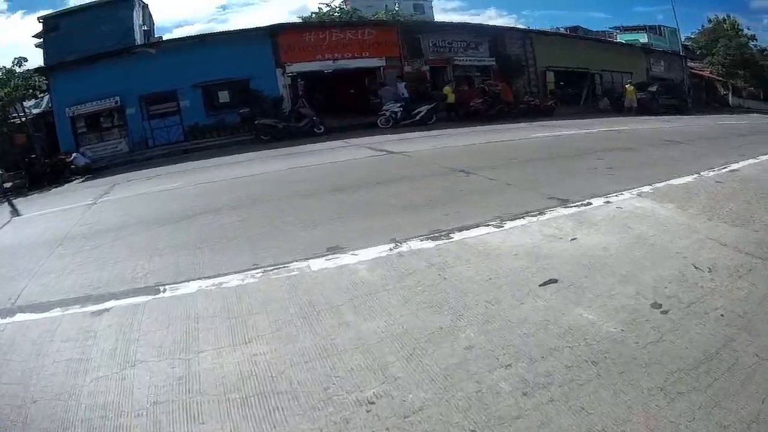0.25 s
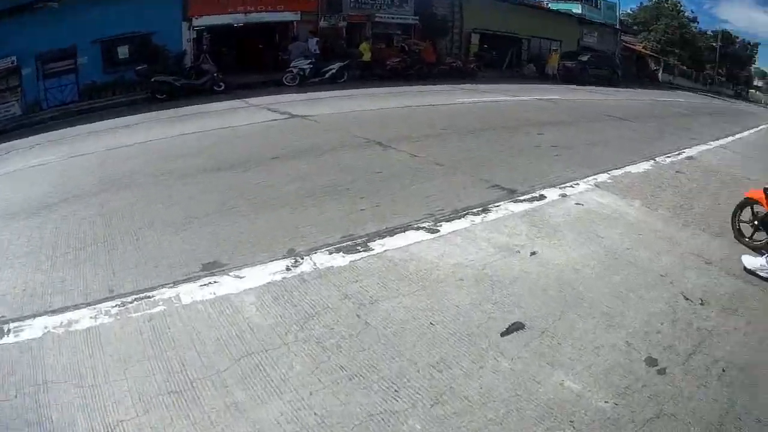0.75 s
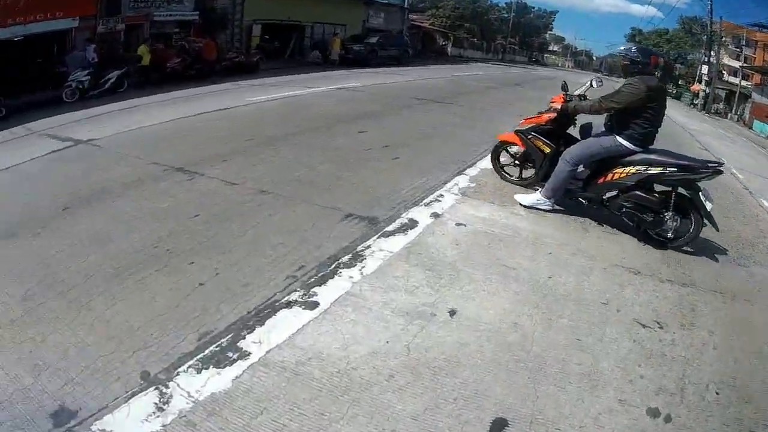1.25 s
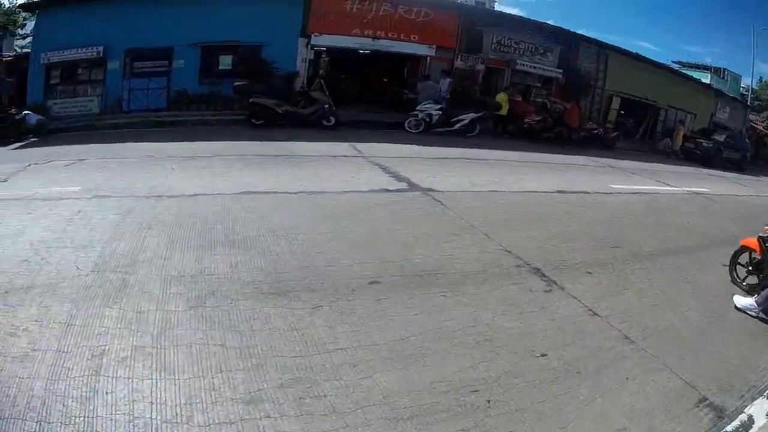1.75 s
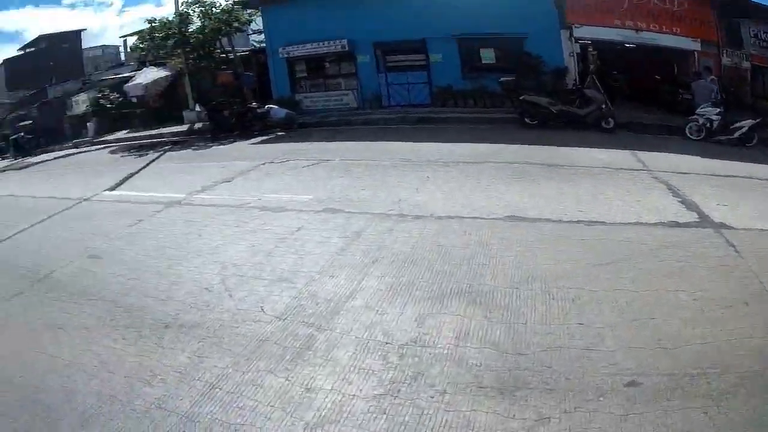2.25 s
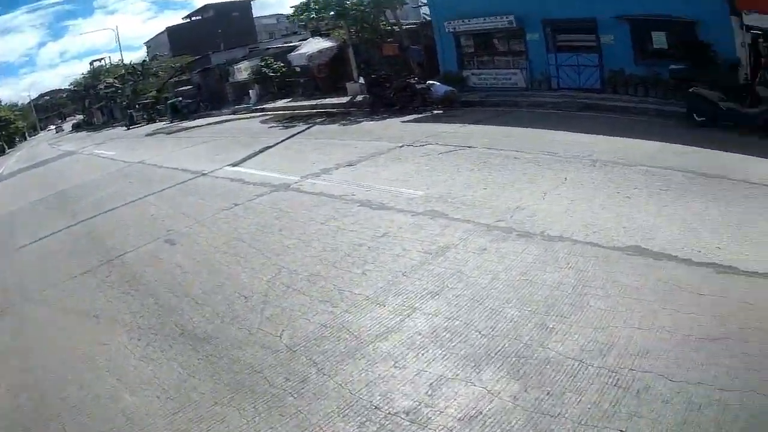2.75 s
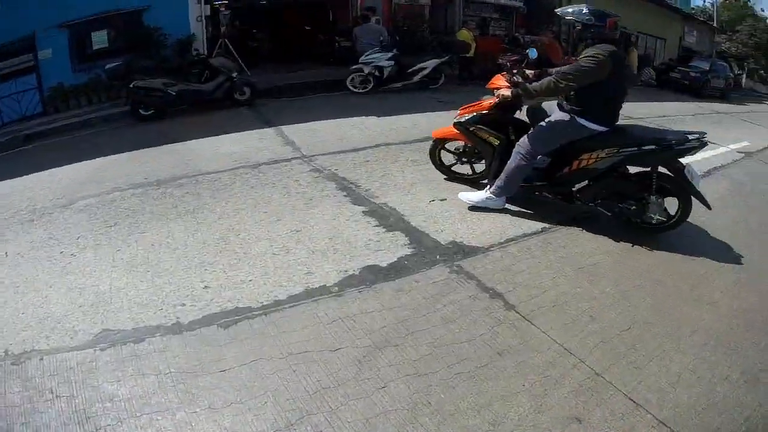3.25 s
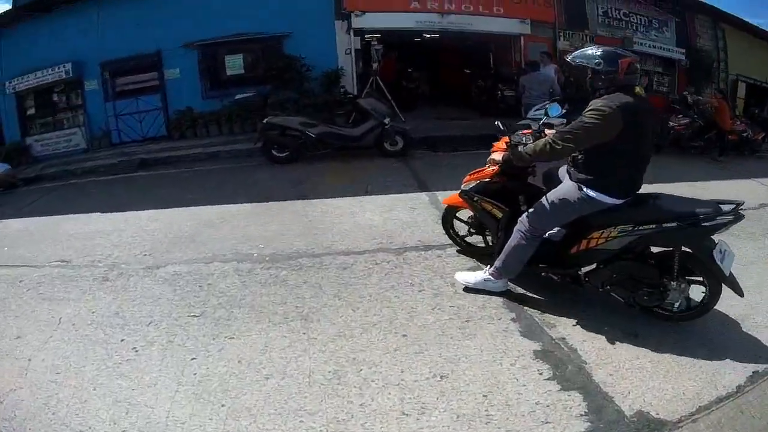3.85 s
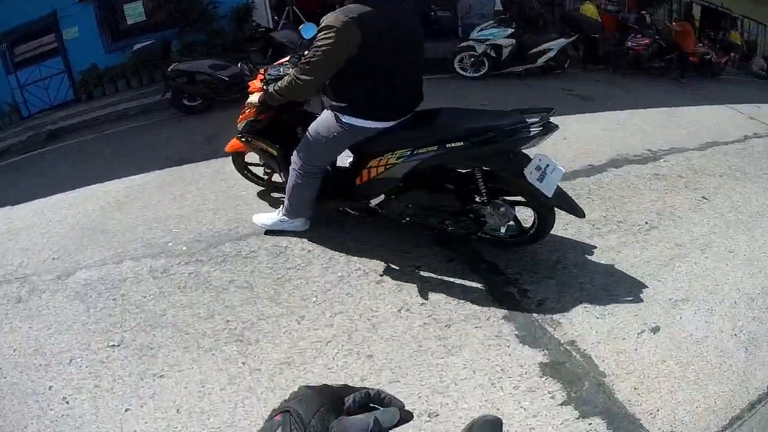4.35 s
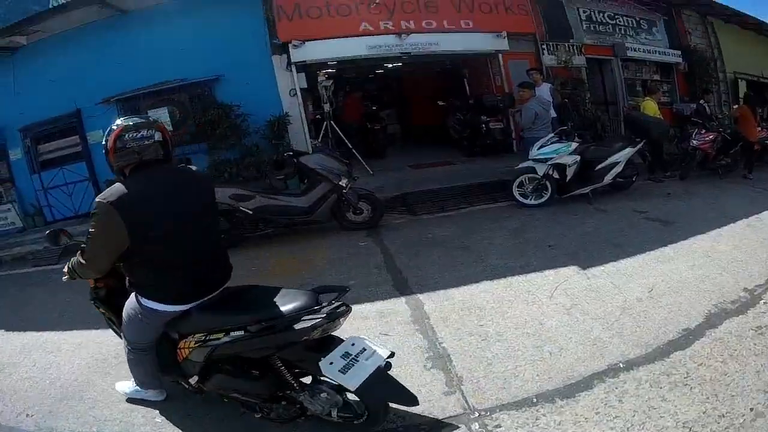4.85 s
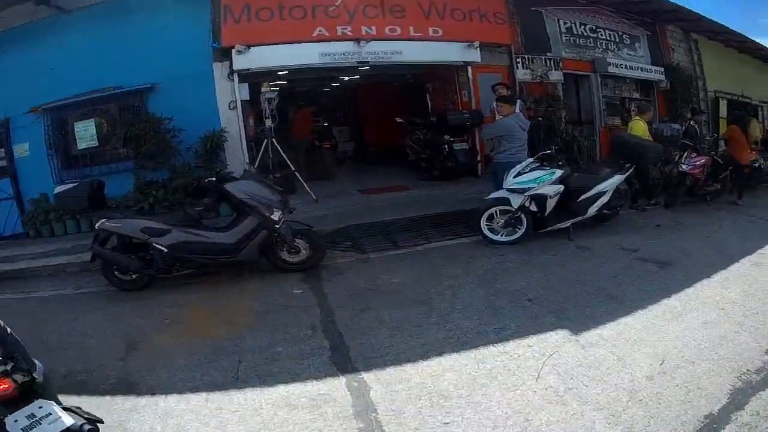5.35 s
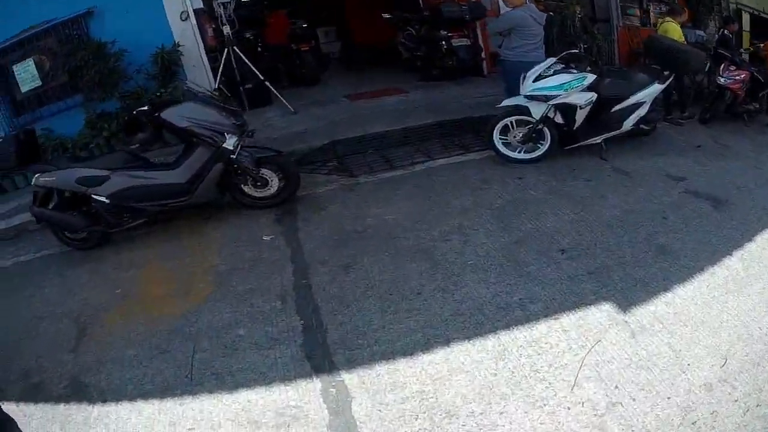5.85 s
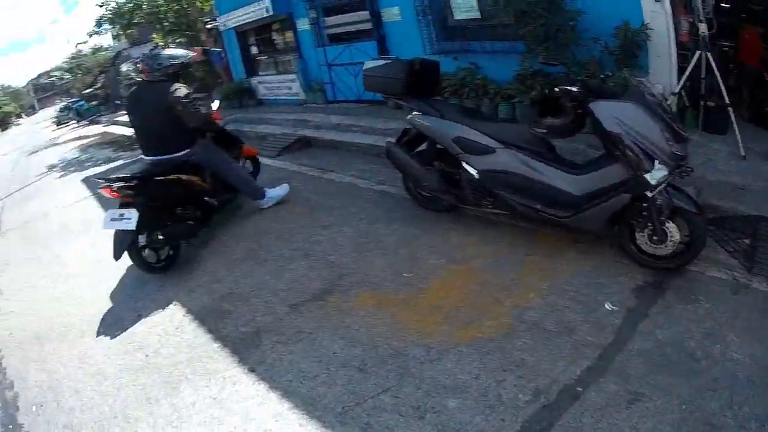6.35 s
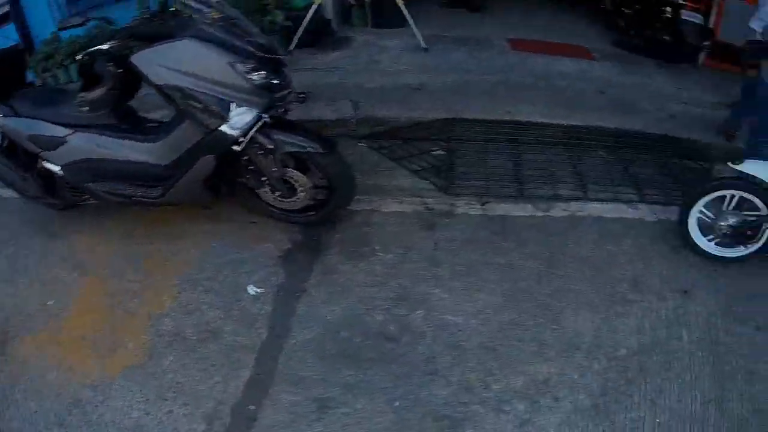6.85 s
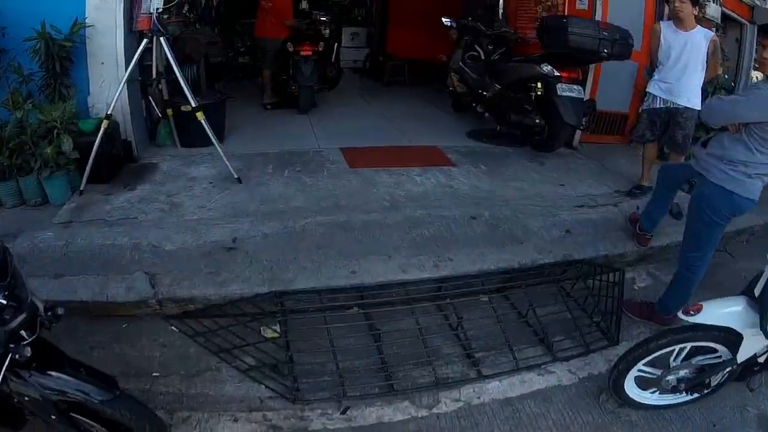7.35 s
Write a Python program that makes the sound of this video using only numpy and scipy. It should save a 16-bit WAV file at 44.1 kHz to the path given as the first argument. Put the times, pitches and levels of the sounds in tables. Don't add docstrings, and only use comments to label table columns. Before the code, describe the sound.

A small scooter putters down to a slow idle beside a road, with heavy low thumps on the microphone, rumbling wind and thin belt whine.

```python
import sys
import numpy as np
from scipy import signal
from scipy.fft import rfft, irfft
from scipy.io import wavfile
from scipy.ndimage import uniform_filter1d, minimum_filter1d

SR = 44100
rng = np.random.default_rng(int(sys.argv[2]) if len(sys.argv) > 2 else 0)


def to_linear_factor(level_db):
    exponent = np.asarray(level_db, float) / 20
    return 10 ** exponent


def master_out(mix):
    frames = np.transpose(np.atleast_2d(mix))
    ceiling = np.clip(frames, -1, 1)
    pcm = np.round(ceiling * 32767).astype(np.int16)
    wavfile.write(sys.argv[1], SR, pcm)


N = 335160


def rms_one(x):
    return x / np.sqrt(np.mean(x ** 2) + 1e-20)


def in_time(rows):
    s, *columns = np.transpose(rows)
    ends_early = s[-1] < N / SR - .1
    t = np.arange(N) / SR
    return [np.interp(t, s, c, left=-120, right=-120 if ends_early else c[-1]) for c in columns]


def swells(rows, rest_db):
    t, power = np.arange(0, N, 32) / SR, 0
    for s, db, length in rows:
        power = power + to_linear_factor(2 * db) * np.exp(-2 * ((t - s) / length) ** 2)
    return np.sqrt(np.interp(np.arange(N) / SR, t, power) + to_linear_factor(2 * rest_db))


def drift(rate):
    r = np.exp(-80 * np.pi * rate / SR)
    slow = signal.lfilter([1], [1, -2 * r, r * r], rng.standard_normal(N // 40 + 2002))[2000:]
    return np.interp(np.arange(N) / 40, np.arange(len(slow)), rms_one(slow))


def steadied(x, size):
    steady_share = .55
    power = uniform_filter1d(uniform_filter1d(x ** 2, size=size), size=size)
    return rms_one(x / (power + 1e-12) ** (steady_share / 2))


def ring(clicks, hz, t60):
    r, w = to_linear_factor(-60 / (t60 * SR)), 2 * np.pi * hz / SR
    return signal.lfilter([0, np.sin(w)], [1, -2 * r * np.cos(w), r * r], clicks + 1e-18)


def resonant(x, peaks, flicker_db):
    out = 0
    for k, (hz, width, db) in enumerate(peaks):
        r = np.exp(-np.pi * width / SR)
        poles = [1, -2 * r * np.cos(2 * np.pi * hz / SR), r * r]
        section = [(1 - r * r) / 2, 0, (r * r - 1) / 2] + poles
        gain = to_linear_factor(db + flicker_db * drift(25))
        out = out + (-1) ** k * gain * signal.sosfilt([section, section], x)
    return rms_one(out)


def coloured(spectrum):
    hz, db = np.transpose(spectrum)
    grid = np.log(np.arange(1, N // 2 + 2) * SR / N)
    gain = to_linear_factor(np.interp(grid, np.log(hz), db, left=-90, right=-90))
    return rms_one(irfft(rfft(rng.standard_normal(N)) * gain, N))


def add(out, s, piece):
    at = round(s * SR)
    out[at:at + len(piece)] += piece[:N - at]


# start_s, firing_rate_hz
FIRING = [(0.0, 27.56), (0.22, 27.25), (0.43, 21.97), (0.9, 19.66), (1.16, 25.99), (1.33, 26.75),
          (1.41, 33.43), (1.74, 22.47), (2.06, 20.76), (3.02, 16.36), (3.29, 16.53), (3.72, 14.65),
          (4.44, 14.37), (4.7, 17.81), (4.86, 19.86), (5.51, 14.72), (6.57, 14.47), (7.6, 15.23)]


def cycle():
    first_turn = .72
    return first_turn + np.cumsum(in_time(FIRING)[0]) / SR


# start_s, level_db
CLATTER = [(0.0, -32.5), (0.27, -35.5), (0.93, -38.5), (1.08, -35), (1.35, -30), (1.6, -33), (1.95, -38),
           (2.2, -39.5), (2.45, -36), (2.8, -42), (3.35, -39), (4.2, -38), (4.9, -37.5), (5.3, -40.5),
           (5.6, -39.5), (6.55, -38.5), (7.35, -39), (7.6, -36)]


def effort():
    level_db, = in_time(CLATTER)
    return level_db - level_db.mean()


def throb(turns):
    angle = 2 * np.pi * (turns - .1)
    return to_linear_factor(1.3 * np.cos(2 * angle) + .8 * np.cos(angle))


def grains():
    jumps = to_linear_factor(.7 * rng.exponential(1, N // 64 + 1))
    return rng.standard_normal(N) * jumps.repeat(64)[:N]


# pitch_hz, level_db
HISS = [(530, -7), (900, 1), (1450, -12), (2000, -1.5), (3070, -13), (9510, -17.5), (14400, -20),
        (15500, -6)]


def hiss():
    return to_linear_factor(-49) * coloured(HISS)


# start_s, level_db
WIND = [(0.0, -34.5), (0.8, -35.5), (1.44, -31), (1.75, -35.5), (2.24, -33.5), (2.45, -23.5), (2.63, -23),
        (2.69, -37), (2.83, -30), (3.2, -33), (3.36, -29), (3.6, -33), (3.78, -26), (4.02, -37),
        (4.7, -32.5), (5.52, -36.5), (6.4, -34), (7.6, -36.5)]
# peak_s, level_db, length_s, size_db (large buffet, small rumble)
EDDIES = [(.2, -33.5, 0.39, -9.5), (.63, -55, 0.13, -4), (1.12, -24.5, 0.069, -5.5), (1.5, -22.5, 0.17, 6),
          (1.9, -30.5, 0.064, -10), (2.05, -24.5, 0.036, -10.5), (2.52, -18.5, 0.11, -4),
          (2.34, -30, 0.042, 4), (1.7, -34.5, 0.076, -9), (4.17, -22, 0.032, -9), (5.06, -29, .06, -3),
          (4.29, -28, 0.027, -11.5), (4.95, -25.5, 0.07, -6), (5.22, -23, .08, -6.5),
          (.3, -30.5, 0.044, -11), (2.97, -23, 0.051, 0), (3.1, -27.5, 0.12, 2.5), (3.38, -22, 0.044, -4),
          (1.35, -23.5, .05, -7), (.78, -34, 0.072, -5), (3.68, -23, 0.065, -7), (3.82, -20.5, 0.24, -6.5),
          (4.23, -29, 0.17, 3), (4.44, -23, 0.19, 1), (4.76, -21, 0.11, -2), (4.95, -23.5, 0.096, 2.5),
          (5.42, -25.5, 0.2, -3), (5.84, -20.5, 0.097, -2.5), (6.18, -26, 0.16, -3.5),
          (6.33, -18.5, 0.13, 3.5), (6.54, -29.5, 0.12, -7.5), (6.72, -23, 0.1, 1.5),
          (6.94, -26, 0.07, -9.5), (7.25, -32, 0.39, -4.5), (7.47, -32, 0.084, 5)]
# pitch_hz, level_db_per_hz
BUFFET = [(5.9, -45), (10, -5), (43, -10), (70, -13), (91, -38), (150, -120)]
RUMBLE = [(35, -20), (48, -4), (64, 0), (80, -6), (100, -17), (150, -27)]
ROAR = [(110, 4.5), (160, -3), (230, -8), (350, -11), (600, -14), (800, -20.5), (1070, -27.5), (1400, -29)]


def wind():
    lumps, calm_db, roar_db = drift(12), -29, 0.5
    large = swells([(s, db + size, length) for s, db, length, size in EDDIES], calm_db)
    small = swells([(s, db - size, length) for s, db, length, size in EDDIES], calm_db)
    out = large * to_linear_factor(1.0 + 2.9 * lumps) * coloured(BUFFET)
    shed = steadied(coloured(RUMBLE), size=900)
    out += small * to_linear_factor(-.5 + 1.2 * lumps + .8 * drift(7)) * shed
    flow_db = in_time(WIND)[0] + roar_db + 0.087 * lumps + 1.63 * drift(35.0)
    return out + to_linear_factor(flow_db) * coloured(ROAR)


# peak_s, level_db, length_s
SEAMS = [
    (1.05, -45, 0.079),
    (1.37, -40, 0.2),
    (2.45, -43, 0.38),
    (3.43, -44, 0.22),
    (4.78, -44.5, 0.28),
    (6.31, -41, 0.035),
    (6.68, -40, 0.024),
    (2.5, -39.5, 0.086),
]
# pitch_hz, width_hz, level_db
TYRES = [(1487, 335, 9), (1180, 1080, -1.5)]


def tyres():
    mean_db, follows = -48, 0.91
    gain = swells(SEAMS, mean_db + follows * effort())
    return gain * resonant(grains(), TYRES, flicker_db=.9)


# peak_s, level_db, length_s
DRONE = [(0.7, -41.5, 0.47), (1.46, -40, 0.18), (1.88, -36, 0.37), (2.5, -39, 0.11), (3.05, -34.5, 0.2),
         (3.5, -27.5, 0.31), (3.9, -29, 0.45), (4.74, -31.5, 0.04), (5.1, -35.5, 0.56), (5.65, -47, 0.34),
         (6.45, -34, 0.44), (6.72, -35.5, 0.19)]
# pitch_hz, width_hz, level_db
PIPE = [(207.6, 18, 1.5), (253.8, 24.3, -2), (340, 56, -7.5), (586.5, 51, -17.5), (804, 18, -14.5)]


def drone():
    return swells(DRONE, -55) * to_linear_factor(-2.0) * resonant(rng.standard_normal(N), PIPE, flicker_db=2.5)


# peak_s, level_db, length_s
ALONGSIDE = [
    (2.42, -49, 0.24),
    (4.78, -39.5, 0.45),
    (5.15, -43, 0.24),
    (6.58, -44, 0.26),
    (7.2, -47, 0.12),
]
# pitch_hz, width_hz, level_db
FLANK = [(2732, 164, 3), (2474, 104, -4), (2225, 500, -7)]


def alongside(turns):
    mean_db, follows = -48, 1
    gain = swells(ALONGSIDE, mean_db + follows * effort())
    return gain * throb(turns) * resonant(grains(), FLANK, flicker_db=.9)


# peak_s, level_db, length_s
TURNS = [
    (0.0, -43, 0.11),
    (1.43, -41.5, 0.1),
    (2.64, -49, 0.15),
    (.15, -51, .1),
    (4.95, -55, 0.73),
    (5.97, -50, 0.61),
    (7.07, -45.5, 0.16),
]
# pitch_hz, width_hz, level_db
RUSTLE = [(4300, 1400, 7), (5700, 1630, 1), (6400, 1640, 1), (7950, 1270, 0)]


def rustle(turns):
    mean_db, follows = -50, 0.45
    gain = swells(TURNS, mean_db + follows * effort()) * to_linear_factor(-3.0)
    return gain * throb(turns) * resonant(grains(), RUSTLE, flicker_db=2.0)


# peak_s, level_db, length_s
SCUFF = [
    (6.665, -43.5, 0.028),
    (6.778, -41.5, 0.018),
    (7.455, -37, 0.04),
    (7.55, -37, 0.04),
    (7.578, -33.5, 0.019),
]
# pitch_hz, width_hz, level_db
CLOTH = [(3580, 530, 6.5), (4203, 590, 3.5), (5900, 1300, -6), (7570, 940, -5), (9900, 2600, -21)]


def scuff():
    slips = (rng.random(N) < 6000 / SR) * rng.standard_normal(N)
    slips = slips + 0.042 * rng.standard_normal(N)
    return swells(SCUFF, -120) * resonant(slips, CLOTH, flicker_db=1.5)


# start_s, peak_db, pitch_hz, t60_s, crack_db
TICKS = [(0.4, -14, 3350, 0.012, -9), (.409, -23.5, 3800, 0.047, -9), (0.454, -21, 3040, 0.016, -4),
         (1.2047, -41.5, 3040, 0.016, -9), (1.6701, -22, 2820, 0.012, -7), (3.4083, 2.5, 3540, 0.0078, -18),
         (3.914, -23, 2900, 0.02, -14), (4.573, -10, 2910, 0.014, -8), (4.629, -17, 2770, 0.016, -10),
         (4.9517, -16, 2900, 0.022, -23), (6.095, -21, 2750, 0.02, -9), (6.6506, -19, 2800, 0.012, -5),
         (6.77, -25, 4250, 0.015, 0), (6.99, -21, 3200, 0.029, -17), (7.373, -9, 3200, 0.011, -11),
         (7.427, -29, 3450, 0.013, -8), (7.447, -18, 3400, 0.011, -1), (7.545, -24, 3730, 0.047, -5),
         (7.582, -16, 3680, 0.015, -7)]
# start_s, peak_db, pitch_hz, t60_s
KNOCKS = [(.9065, -14, 520, .016), (.9065, -19, 700, .016), (.907, -16.5, 154, .036),
          (.9155, -18, 420, .02), (1.136, -6, 91, .06), (1.137, -7, 440, .021), (1.137, -17, 780, .018),
          (1.381, -24, 1400, .025), (2.389, -21, 250, .3), (2.469, -16, 600, .022), (2.501, -17, 255, .09),
          (2.5425, -5, 1400, .011), (2.5425, -10, 1060, .011), (2.5425, -22, 2300, .009),
          (2.548, -14, 119, .072), (2.606, -23, 570, .03), (2.605, -19, 250, .07), (3.412, -20, 250, .05),
          (6.673, -36, 1500, .03), (6.677, -31, 760, .04), (6.684, -37, 1150, .03)]


def fittings():
    out, t = np.zeros(N), np.arange(round(.1 * SR)) / SR
    band = signal.butter(2, [3200, 8000], "band", fs=SR, output="sos")
    cracks = signal.sosfilt(band, rng.standard_normal((len(TICKS), len(t))))
    for (s, db, hz, t60, crack_db), crack in zip(TICKS, cracks):
        body = to_linear_factor(crack_db) * crack
        for ratio, height in [(1, 1), (1.112, 0.67), (0.925, .5), (1.21, 0.12)]:
            body = body + height * np.sin(2 * np.pi * ratio * hz * t)
        add(out, s, to_linear_factor(db - 3 - 60 * t / t60) * np.clip(t / .0011, 0, 1) * body)
    for s, db, hz, t60 in KNOCKS:
        body = np.sin(2 * np.pi * hz * t) + .5 * np.sin(2 * np.pi * 1.14 * hz * t)
        onset = np.sin(np.clip(t / 0.00092, 0, np.pi / 2)) ** 2
        add(out, s, -to_linear_factor(db - 60 * t / t60) * onset * body)
    return out


# level_db, pitch_hz, t60_s
SWINGING = (-12, 22, 0.14)
# start_s, sway_peak_db, sway_hz, shudder_peak_db, length_s
STRIDES = [(0.024, -17, 27.8, -18.5, 0.031), (0.406, -1, 24.4, -10.5, 0.09), (0.901, -3, 36.6, 1.5, 0.041),
           (0.984, -10, 24, -13, 0.02), (1.126, -22, 40, -8.5, 0.011), (1.391, -10.5, 20.4, -37, 0.12),
           (1.917, -1, 23.36, -4.5, 0.1), (2.421, -8.5, 23.7, -16.5, 0.092), (2.556, -7.5, 27.1, -3, 0.027),
           (2.948, -6.5, 21.2, -15, 0.093), (3.463, -6.5, 27.2, -13, 0.039), (3.551, -6.5, 28, -17, 0.044),
           (4.04, -7, 29.3, -12, 0.049), (4.587, -2, 27, -9.5, 0.05), (5.149, -7.5, 28.5, -20, 0.027),
           (5.689, -7.5, 25.7, -13, 0.076), (5.886, -14.5, 30.4, -13.5, 0.042),
           (6.225, -8, 25.6, -7.5, 0.033), (6.35, -16, 29.3, -12, 0.047), (6.848, -15, 28.9, -24, 0.1),
           (7.374, -4.5, 25.2, -14, 0.077)]


def strides():
    shudder_lag_s = 0.0104
    (db, hz, t60), t = SWINGING, np.arange(N) / SR
    out = to_linear_factor(db - 60 * t / t60) * np.cos(2 * np.pi * hz * t)
    for s, sway_db, sway_hz, shudder_db, length in STRIDES:
        shudder_hz = 62.54 + 0.75 * sway_db
        t = np.arange(round((length + .15) * SR)) / SR
        held = np.clip(t / 0.007, 0, 1) * np.exp(-np.clip(t - length, 0, 1) / 0.026)
        shudder = np.sin(2 * np.pi * shudder_hz * t) + 0.1 * np.sin(2 * np.pi * 2.3 * shudder_hz * t)
        add(out, s, held * to_linear_factor(sway_db) * np.sin(2 * np.pi * sway_hz * t))
        add(out, s + shudder_lag_s, held * to_linear_factor(shudder_db) * shudder)
    return out


# peak_s, level_db, length_s
SQUEAL = [
    (2.6, -42, 0.064),
    (2.7, -54, .06),
    (2.82, -49, 0.033),
    (2.92, -59, 0.2),
]
# pitch_hz, width_hz, level_db
DRUM = [(5600, 330, -5), (6250, 260, -3), (6800, 250, -7), (7300, 400, -11), (9200, 500, -16)]


def brake():
    return swells(SQUEAL, -120) * resonant(rng.standard_normal(N), DRUM, flicker_db=1.5)


# start_s, peak_db, start_hz, end_hz, length_s
CHIRPS = [(0.572, -43, 5900, 6660, .012), (3.752, -45, 6200, 6210, 0.028), (3.839, -46, 4340, 5300, .015),
          (3.974, -45, 5100, 5980, .014), (4.042, -41, 5200, 6400, 0.015),
          (4.109, -39.5, 4564, 6740, 0.019), (4.18, -42, 5570, 5990, 0.011),
          (4.193, -40, 4300, 4590, 0.0098), (4.253, -44.5, 5700, 6500, .011), (4.334, -48, 5820, 5900, .01),
          (7.009, -29.5, 3690, 3280, 0.044)]


def chirps():
    out = np.zeros(N)
    for s, db, start_hz, end_hz, length in CHIRPS:
        count = round(length * SR)
        phase = 2 * np.pi * np.cumsum(np.linspace(start_hz, end_hz, count)) / SR
        add(out, s, to_linear_factor(db) * np.hanning(count) * np.sin(phase))
    return out


# start_s, peak_db, start_hz, end_hz, length_s
GLIDES = [(1.003, -38, 3220, 3010, .15), (1.238, -34, 3120, 2900, 0.122), (1.331, -36, 2960, 3120, .12),
          (3.803, -42, 3110, 3020, .2), (4.561, -33, 3010, 2700, 0.19), (4.8, -34, 2760, 3070, .16),
          (4.998, -35.5, 2950, 3030, .16), (5.148, -40, 3400, 3290, .12), (5.592, -38.5, 3080, 2840, .07),
          (5.79, -39, 3000, 3270, 0.13), (6.29, -36, 3065, 2940, .1), (6.418, -37.5, 2950, 3170, 0.1),
          (6.53, -38, 2690, 2760, 0.081), (7.041, -35, 3125, 2960, .12), (7.15, -34, 2996, 3480, .07)]


def glides():
    out, rough, wobble_hz = np.zeros(N), to_linear_factor(2.4 * drift(50)), 29.8 * drift(41)
    for s, db, start_hz, end_hz, length in GLIDES:
        count = round(length * SR)
        hz = np.linspace(start_hz, end_hz, count) + wobble_hz[round(s * SR):][:count]
        add(out, s, to_linear_factor(db) * np.hanning(count) * np.sin(2 * np.pi * np.cumsum(hz) / SR))
    return out * rough


WHINE_DB = -42
# peak_s, level_db, length_s
PULLS = [(1.11, -30, 0.058), (1.19, -31, 0.045), (1.31, -28.5, 0.084), (1.42, -30, 0.12),
         (1.84, -34.5, 0.047), (3.41, -36, 0.1), (3.85, -40, 0.055), (3.97, -31, 0.11), (4.17, -33, 0.083),
         (4.33, -29, 0.083), (4.51, -30, .07), (4.42, -31.5, 0.35), (4.95, -31, 0.23), (5.28, -32.5, 0.082),
         (3.2, -39.5, 0.25), (3.7, -35, 0.45), (5.7, -41, 0.086), (5.83, -36, .05), (6.02, -35, 0.022),
         (6.35, -33.5, 0.077), (6.47, -34, 0.08), (6.82, -40, 0.041), (7.1, -33.5, 0.12), (.74, -40, 0.044)]
# pitch_hz, width_hz, level_db
PULLEY = [(2872, 107, 3), (3186, 87, 2.5), (2554, 120, -11), (1470, 44, -9.5)]


def pulley():
    sung = resonant(rng.standard_normal(N), PULLEY, flicker_db=4.5)
    return swells(PULLS, WHINE_DB) * to_linear_factor(-10) * sung


# start_s, pitch_hz
WHINE = [(0.0, 3210), (1.1, 3060), (1.3, 2991), (1.45, 3050), (2.5, 3068), (3.41, 3085), (4.2, 3035),
         (4.55, 3008), (4.85, 2936), (5.0, 3003), (5.63, 2980), (5.82, 3020), (6.02, 3164), (6.3, 3010),
         (6.52, 3113), (6.6, 3040), (7.13, 3040), (7.6, 3055)]
# offset_hz, level_db
STRANDS = [(0, -3), (-320, -13.5), (320, -16.5)]
# peak_s, level_db, length_s
LOW_RIB = [
    (1.22, -40, .06),
    (1.46, -36, 0.088),
    (4.706, -33.5, 0.17),
    (4.87, -46, 0.055),
    (5.071, -43, 0.05),
    (5.25, -43, 0.085),
    (6.597, -39, .07),
]
# peak_s, level_db, length_s
HIGH_RIB = [
    (1.106, -42, 0.1),
    (1.3, -36, .04),
    (1.41, -32, 0.08),
    (1.53, -33, .05),
    (4.915, -37, .06),
    (5.177, -40, 0.094),
    (6.504, -43, 0.044),
    (6.66, -35, 0.044),
    (7.32, -43, 0.037),
]


def whine(width_hz, wander_hz):
    hz, = in_time(WHINE)
    out, pull = np.zeros(N), swells(PULLS, WHINE_DB + 0.4 * effort())
    low_pass = signal.butter(2, width_hz / 2, fs=SR, output="sos")
    bites_by_rib = [0, swells(LOW_RIB, -120), swells(HIGH_RIB, -120)]
    for (offset_hz, strand_db), bites in zip(STRANDS, bites_by_rib):
        slow = signal.sosfilt(low_pass, rng.standard_normal((2, N)))
        phase = 2 * np.pi * np.cumsum(hz + offset_hz + wander_hz * drift(3)) / SR
        strand = steadied(slow[0] * np.cos(phase) + slow[1] * np.sin(phase), size=250)
        out += np.hypot(pull * to_linear_factor(strand_db), bites) * to_linear_factor(.8 * drift(4)) * strand
    return to_linear_factor(-4.5) * out


# start_s, peak_db
TAPS = [(0.115, -21), (0.197, -28), (0.3061, -26), (1.5902, -27), (2.325, -30), (3.058, -30), (3.239, -29),
        (3.3821, -31), (3.6126, -30), (3.7288, -32), (3.942, -34), (4.04, -23), (4.1485, -25), (4.329, -39),
        (4.3619, -33), (4.519, -22), (4.6203, -24), (4.6867, -29), (4.735, -23), (4.789, -25),
        (4.8404, -23), (4.952, -32), (5.0041, -33), (5.032, -35), (5.059, -25), (5.1194, -26), (5.235, -23),
        (5.285, -28), (5.471, -30), (5.535, -27), (5.8106, -33), (6.428, -30), (6.507, -29), (6.57, -24),
        (6.6297, -37), (6.967, -25), (7.1222, -30), (7.466, -29.5), (7.552, -33), (7.565, -31),
        (7.5722, -29)]
# pitch_hz, width_hz, level_db
TAPPET = [(2380, 350, 0.5), (2750, 330, 0), (3050, 460, 5), (3370, 380, -7), (4300, 450, -10),
          (7400, 1300, -18)]
# start_s, peak_db
SPITS = [
    (2.5551, -34),
    (3.4085, -50),
    (4.5711, -40),
    (4.6294, -52),
    (0.4539, -52),
]


def taps():
    tap_db, tap_t60_s = -4.5, 0.038
    struck, spat, t = np.zeros(N), np.zeros(N), np.arange(round(.05 * SR)) / SR
    for (s, db), burst in zip(TAPS, rng.standard_normal((len(TAPS), len(t)))):
        add(struck, s, to_linear_factor(db + tap_db - 60 * t / tap_t60_s) * burst)
    for s, db in SPITS:
        add(spat, s, to_linear_factor(db + 6.0) * np.array([1., -1.]))
    high_pass = signal.butter(4, 8500, "high", fs=SR, output="sos")
    covered = struck.std() * resonant(struck + 1e-18, TAPPET, flicker_db=3.0)
    return covered + signal.sosfilt(high_pass, spat + 1e-18)


# pitch_hz, width_hz, level_db
CASE = [(3040, 490, 5), (3388, 104, 4), (3543, 305, 0), (4305, 340, -11.5)]


def clatter(turns):
    level_db = in_time(CLATTER)[0] - 3
    return to_linear_factor(level_db) * throb(turns) * resonant(grains(), CASE, flicker_db=.7)


# peak_s, level_db, length_s
BLIP = [
    (0.03, -39.5, 0.79),
    (1.365, -19.5, 0.065),
]


def bark_db():
    return 20 * np.log10(swells(BLIP, -47.5))


# pitch_hz, level_db, t60_s
INTAKE = [(409, 3, 0.045), (1453, 0, 0.019)]


def intake(turns):
    opened, level_db, out = np.diff(np.floor(turns + .42), prepend=0) > 0, bark_db(), np.zeros(N)
    for hz, db, t60 in INTAKE:
        out += ring(opened * to_linear_factor(level_db + db + 1.5 * rng.standard_normal(N)), hz, t60)
    return out


# pitch_hz, level_db, t60_s
HEAD = [(6850, -41, 0.046), (7230, -17, 0.032), (7900, -28, 0.04)]


def head(turns):
    fired, level_db, out = np.diff(np.floor(turns), prepend=0) > 0, bark_db(), np.zeros(N)
    for hz, db, t60 in HEAD:
        out += ring(fired * to_linear_factor(level_db + db + 3 * rng.standard_normal(N)), hz, t60)
    return out


# start_s, exhaust_peak_db
LOAD = [(0, -21), (.9, -19), (1.28, -18.5), (1.4, -13), (1.45, -21.5), (1.7, -14), (2.2, -29), (3, -20.5),
        (3.8, -15), (4.4, -13.5), (4.75, -10.5), (5.3, -12), (6.3, -14), (6.8, -14), (7.6, -18.5)]
# peak_s, peak_db, length_s
BACKBEAT = [
    (3.5, -12, 0.22),
    (3.9, -16.5, 0.22),
]
# pitch_hz, level_db, t60_s
SILENCER = [(65.7, -13.5, 0.37), (140.6, -17, 0.13)]


def exhaust(turns):
    pop_hz, pop_rise_hz_s, pop_width_s = 105, 3000, .0055
    strength = to_linear_factor(in_time(LOAD)[0] + rng.standard_normal(N))
    fired = (np.diff(np.floor(turns), prepend=0) > 0) * strength
    between = (np.diff(np.floor(turns + .5), prepend=1) > 0) * swells(BACKBEAT, -120)
    t = np.arange(-800, 801) / SR
    pop = np.cos(2 * np.pi * (pop_hz + pop_rise_hz_s * t) * t) * np.exp(-(t / pop_width_s) ** 2)
    out = signal.fftconvolve(fired + between, pop - pop.mean(), "same")
    soft = signal.sosfilt(signal.butter(2, 150, fs=SR, output="sos"), fired + 1e-18)
    for hz, db, t60 in SILENCER:
        out += to_linear_factor(db) * ring(soft, hz, t60)
    return out


def scene():
    turns = cycle()
    surroundings = hiss() + wind() + tyres() + drone() + alongside(turns)
    handling = rustle(turns) + scuff() + fittings() + strides()
    drive = brake() + chirps() + glides() + pulley() + whine(width_hz=75, wander_hz=21.94)
    engine = taps() + clatter(turns) + intake(turns) + head(turns) + exhaust(turns)
    port = surroundings + handling + drive + engine
    return (port - port.mean())[None]


def band_limit(x):
    return signal.sosfilt(signal.butter(12, 16080, fs=SR, output="sos"), x)


def record(dry):
    ceiling_db, release_db_s, cutoff_hz = .35, 21, 15230
    slope = release_db_s * np.arange(N) / SR
    over_db = np.maximum(20 * np.log10(np.abs(dry[0]) + 1e-9) - ceiling_db, 0)
    held_db = np.maximum.accumulate(over_db + slope) - slope
    duck_db = uniform_filter1d(-minimum_filter1d(-held_db, size=133), size=133)
    limited = np.clip(dry * to_linear_factor(-duck_db), -1, 1)
    top_cut = signal.cheby2(14, 40, cutoff_hz, fs=SR, output="sos")
    mix = signal.sosfilt(top_cut, limited)
    return band_limit(mix)


dry = scene()
out = record(dry)
master_out(out)
```